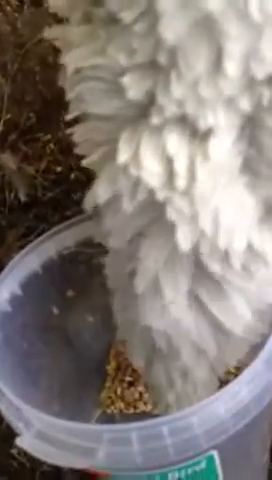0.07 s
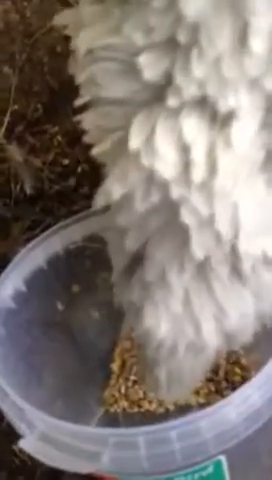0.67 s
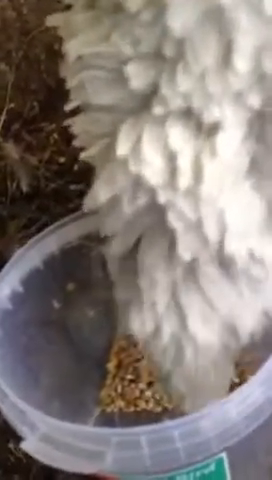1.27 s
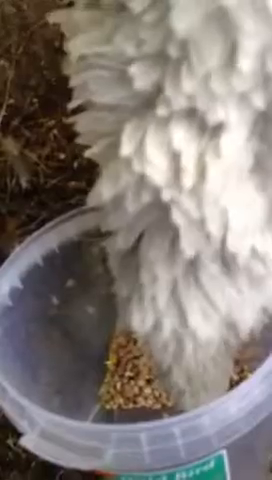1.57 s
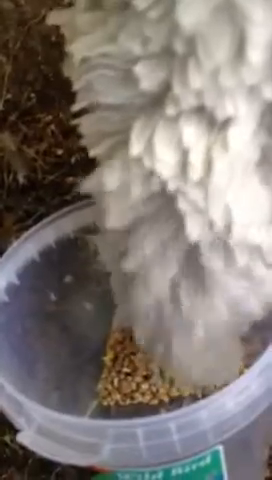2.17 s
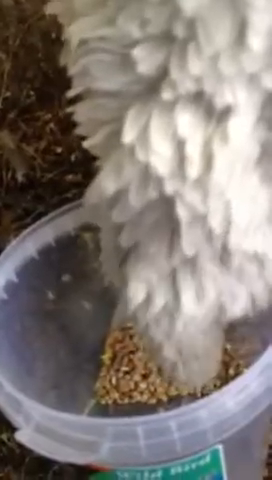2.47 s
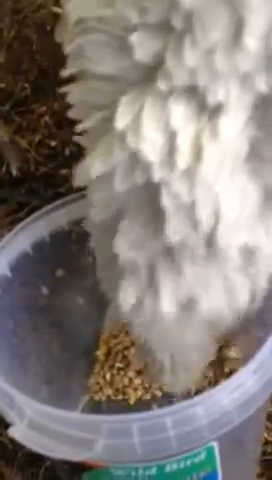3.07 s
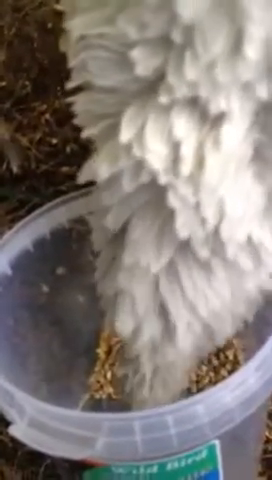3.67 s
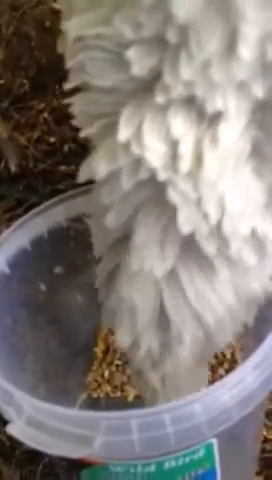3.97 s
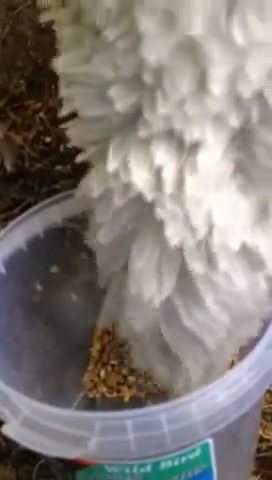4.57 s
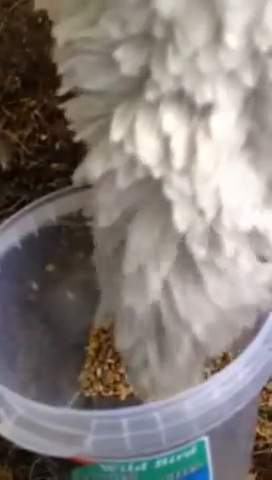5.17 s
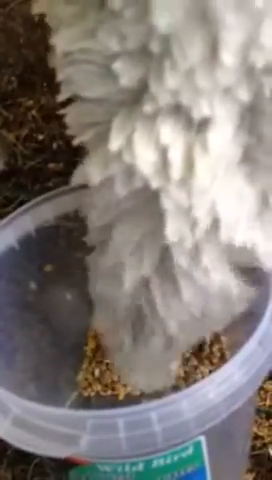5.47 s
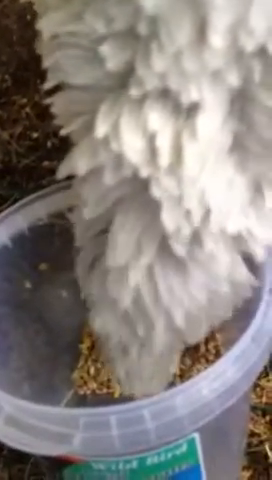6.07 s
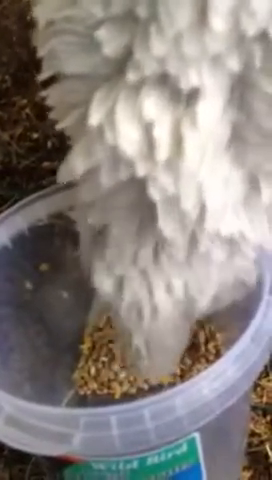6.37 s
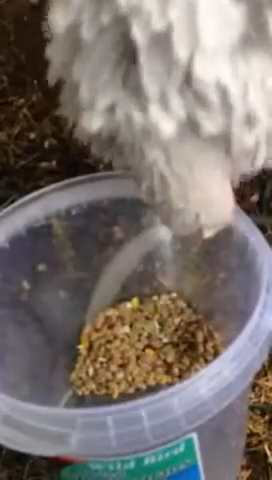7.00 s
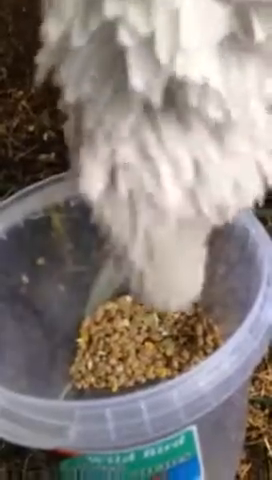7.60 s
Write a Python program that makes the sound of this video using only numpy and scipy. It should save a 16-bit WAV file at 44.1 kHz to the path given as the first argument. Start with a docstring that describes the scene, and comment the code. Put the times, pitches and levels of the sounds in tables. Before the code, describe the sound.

A hen feeds from a plastic tub of seed close by, outdoors, over a quiet steady hiss and a low, far rumble. She gives one soft, short cluck at the very start. Hard pecks land at about 0.4, 1.1 and 3.1 seconds, each crunching through the seed, knocking the tub and throwing up grains that patter down for about half a second. Sharp beak clicks fall between them, clustering near 2.8 seconds. Lighter pecks follow at about 4.7, 4.9, 5.6 and 6.3 seconds, then small ticks of beak and seed, with feathers faintly brushing the rim around 7 seconds. Further off, young birds give short sliding peeps at 2.2 and 3.3 seconds, several between 4.5 and 6, and more around 7.5. One faint, thin whistle rises just after 5 seconds. Brief dry scuffs in the litter come now and then, more often after 6.5 seconds.

```python
"""A hen gives one soft cluck, then three hard pecks knock a plastic tub of seed, close by and outdoors.
Each peck crunches through the seed, makes the tub ring and throws up seed that patters back down.
Lighter pecks and beak clicks follow, and her feathers brush the rim as she lifts her head.
Further off, young birds peep in sliding whistles and scuff in the litter, and one thin whistle rises.
A steady hiss and a low, far rumble lie behind it all."""
import sys
import numpy as np
from scipy import signal
from scipy.fft import rfft, irfft
from scipy.io import wavfile

SR = 44100
rng = np.random.default_rng(int(sys.argv[2]) if len(sys.argv) > 2 else 0)


def bounce(signal):
    """Save signal as a 16-bit WAV file at the path given by the first command-line argument."""
    frames = np.transpose(np.atleast_2d(signal))
    limited = np.clip(frames, -1, 1)
    pcm = np.round(limited * 32767).astype(np.int16)
    wavfile.write(sys.argv[1], SR, pcm)


N = 345744
TIME = np.arange(N) / SR


# The pecks. Each row: start in seconds, length in seconds, crunch in dB, knock in dB, extra floor
# drumming in dB, falling seed in dB, seconds for that to fade by 60 dB, seconds until the seed has landed.
PECKS = [(0.3679, 0.0087, -29.5, -43, -17, -49, 1.9, .375), (1.105, 0.011, -27, -35, -4, -48, 1.3, .44),
         (3.104, 0.0076, -27, -39.5, 9, -46, 1.3, .39), (4.702, 0.015, -53, -61, 12, -54, 0.87, .06),
         (4.896, 0.0015, -43.5, -69, 1, -61.5, .4, .04), (5.641, 0.0037, -40, -49, -4, -63, 0.5, 0.042),
         (6.265, 0.0059, -49.5, -53.5, -2, -63, 0.7, 0.018)]
# The tone of crunching seed. Each row: frequency in Hz, level in dB.
CRUNCH_TONE = [(240, -40), (400, -10), (1100, -11.5), (1800, -8), (3230, -2), (4130, -10.5), (5000, -6),
               (7520, -2), (9360, -15.5), (10400, -33), (22000, -100)]
# The notes of the tub's floor and wall. Each row: pitch in Hz, level in dB, seconds to fade by 60 dB.
TUB_NOTES = [(290, -1.5, 0.055), (490, -22.5, 0.04), (641, -3, 0.0357), (910, -2.5, 0.017),
             (1176, -11.5, .025), (1590, -10.5, 0.015)]

def pecks(lead_s=0.0018, release_s=0.0016, floor_hz=650, floor_width_hz=170):
    """The beak crunches through the seed and knocks the tub, drumming the notes of its floor."""
    out, t = np.zeros(N), np.arange(-SR // 50, SR // 5) / SR
    for start, length, crunch_db, knock_db, floor_db, *_ in PECKS:
        push = np.exp(np.minimum(t, 0) / lead_s - np.maximum(t - length, 0) / release_s)
        crunch = colour(push * rng.standard_normal(len(t)), CRUNCH_TONE)
        add(out, start + t[0], from_db(crunch_db) * crunch)
        blow = signal.unit_impulse(len(t), np.searchsorted(t, length / 2))
        knock = np.zeros(len(t))
        for k, (hz, db, fade_s) in enumerate(TUB_NOTES):
            note_db = db + floor_db * resonance(hz, floor_hz, floor_width_hz) + rng.standard_normal()
            knock += (-1) ** k * from_db(note_db) * ring(blow, hz, fade_s)
        add(out, start + t[0], from_db(knock_db) * band(knock, 170.2, 2400))   # a small tub has no bass
    return out


# Seed sliding or landing in handfuls. Each row: middle in seconds, half length in seconds, level in dB.
HANDFULS = [(.386, 0.0042, -42), (.463, 0.01, -46), (1.392, 0.024, -57.5), (3.097, 0.0079, -41.5),
            (3.178, 0.0082, -52)]
# The tone of pattering seed. Each row: frequency in Hz, level in dB.
PATTER_TONE = [(350, -31), (600, -17), (1160, -10.5), (1320, -21.5), (1510, -7.5), (2870, -6), (4600, -7),
               (7700, -1.5), (9150, -13), (10400, -44.5), (22000, -120)]

def falling_seed(settle_s=0.064, bounce_db=-8, dense_db=-42):
    """Seed thrown up by each peck patters down in uneven clumps, with whole kernels bouncing among it."""
    falling = swells(HANDFULS)
    for start, *_, seed_db, fade_s, landed_s in PECKS:
        age = TIME - start
        fade = np.exp(-np.log(1000) * np.abs(age) / fade_s) * (age > 0)
        still_moving = np.clip((landed_s - age) / settle_s + 1, 0, 1)
        falling += from_db(seed_db) * fade * still_moving
    clumps = from_db(2.3 * drift(70))
    density = np.clip(falling / from_db(dense_db), .1, 1)   # the patter thins out as it dies
    fine = grains(per_s=1900 * density, spread_db=1.5, seed_fade_s=0.0014, seed_db=4)
    fine *= np.sqrt(density.mean() / density)   # thinning alone does not make it quieter
    kernels = from_db(bounce_db) * grains(per_s=78, spread_db=1.5, seed_fade_s=0.001, seed_db=10.5)
    return falling * clumps * colour(fine + kernels, PATTER_TONE)


# The beak tip hitting the tub. Each row: time in seconds, peak in dB, wall level against the snap in dB.
BEAK_CLICKS = [(0.3736, -9, -19.5), (1.1247, -19, -9.5), (1.559, -42, 4), (2.2503, -35.5, 1),
               (2.754, -36.5, 9), (2.79, -24, 0), (2.8364, -40, 1.5), (2.9194, -44.5, 7),
               (3.5563, -37, -2.5), (4.8961, -31.5, -6), (4.9044, -32, 3), (4.9476, -36, -3),
               (5.655, -30, -4.5), (6.2593, -34.5, 22.5), (6.4241, -44, 0.5), (6.5102, -43.5, 0.5),
               (7.135, -37, -1.5), (7.2869, -35.5, -5)]
# The clearest single seeds snapping and landing. Each row: time in seconds, peak in dB.
SEED_CLICKS = [(0.473, -28), (0.494, -20), (0.522, -34), (0.539, -42), (0.5973, -29.5), (0.6342, -41.5),
               (0.661, -38), (0.6878, -42), (0.7578, -49), (1.1462, -27), (1.1541, -29), (1.2045, -43),
               (1.2212, -28.5), (1.3302, -41), (1.4024, -42), (1.4247, -38), (1.5054, -42.5), (2.4742, -50),
               (3.1105, -14.5), (3.1292, -24), (3.2077, -29.5), (3.2314, -32.5), (3.261, -31.5),
               (3.2763, -31), (3.324, -38.5), (3.497, -37.5), (3.5297, -42.5), (4.413, -47), (4.696, -40),
               (4.705, -34.5), (4.7407, -42.5), (5.6454, -41), (5.7447, -41.5), (6.267, -33), (6.7393, -44),
               (6.9029, -43), (7.034, -39.5), (7.0775, -38), (7.187, -32.5), (7.201, -33), (7.2292, -34.5)]

def clicks(snap_s=0.0015, wall_s=0.0019, ping_db=-21, chatter_db=-7):
    """Hard little hits: the seed snaps high and short, the plastic wall answers lower and longer."""
    out, t = np.zeros(N), np.arange(SR // 40) / SR
    hit = signal.unit_impulse(len(t))
    # a seed barely stirs the wall, each by a different amount
    seeds = [(when, db, -19 + 7 * rng.standard_normal()) for when, db in SEED_CLICKS]
    for when, peak_db, wall_db in list(BEAK_CLICKS) + seeds:
        chatter = from_db(chatter_db) * rng.standard_normal((2, len(t)))
        # a light touch on the wall leaves the seed free to ring
        ping = from_db(ping_db - 0.86 * wall_db) * ring(hit, rng.uniform(3700, 4900), 0.001)
        snap = band(hit + chatter[0] * np.exp(-t / snap_s) + ping, 3250, 6900)
        wall = band(hit + chatter[1] * np.exp(-t / wall_s), 800, 3300)
        click = rms_one(snap) + from_db(wall_db) * rms_one(wall)
        add(out, when - t[np.abs(click).argmax()], from_db(peak_db) * click / np.abs(click).max())
    return out


# Strokes of her feathers. Each row: middle in seconds, half length in seconds, level in dB.
FEATHER_STROKES = [(2.851, 0.15, -82), (5.38, 0.14, -74.5), (6.45, 0.48, -83), (6.976, 0.2, -67.5),
                   (7.07, 0.024, -71), (7.278, 0.051, -67), (7.738, 0.016, -68.5)]

def feathers(rest_db=-85, rustle_db=-2):
    """Feathers slide over the rim with a fine rustle and stir a few seeds."""
    uneven_touch = from_db(2 * drift(45))
    pressure = from_db(rest_db) + swells(FEATHER_STROKES)
    stirred = colour(grains(per_s=450, spread_db=7, seed_fade_s=0.0086, seed_db=-15.5), PATTER_TONE)
    rustle = rms_one(band(grains(per_s=1100, spread_db=8.5), 3900, 4900))
    return pressure * uneven_touch * (stirred + from_db(rustle_db) * rustle)


# The young birds' peeps. Each row: start in seconds, seconds until the closing flick, held pitch in Hz,
# opening slide in octaves, flick in octaves (plus is up), level in dB, overtones in dB, hoarseness (0-1).
PEEPS = [(2.171, 0.047, 1880, 0.93, .72, -37, -19.5, 0.04),
         (3.304, 0.046, 1908, 0.25, 0.61, -42.5, -16, 0.06), (4.508, 0.043, 1708, 0.045, 0.74, -42, -15, 0),
         (4.882, 0.039, 1784, .5, -0.47, -39, -28, 0.06),
         (5.029, 0.0091, 1920, 0.28, 0.037, -49.5, -33.5, 0.04),
         (5.064, 0.018, 2047, 0.046, -.5, -41.5, -20, 0), (5.267, .008, 1926, .45, 0.068, -46, -27, 0.2),
         (5.318, 0.0063, 1984, .011, -0.31, -50, -38, 0.35), (5.978, .051, 1907, 0.178, .65, -38, -21.5, 0),
         (7.421, 0.059, 2030, 0.19, 0.27, -44.5, -6, 0.04),
         (7.594, 0.057, 2233, 0.59, 0.26, -41.5, -15, 0.08), (7.607, 0.017, 2500, 0.025, -.22, -49, -11, 0)]

def peeps(slide_s=0.0098, sag_s=0.01485, crest_s=0.0142, push_s=0.0064,
          swell_db_per_s=113, dull_db_per_s=700):
    """Hoarse whistles slide up, hold and flick away, growing louder at pitches where the throat rings."""
    out = np.zeros(N)
    for start, hold_s, held_hz, slide, flick, level_db, overtones_db, hoarse in PEEPS:
        rising = flick > 0
        flick_s, after_s = (0.0036, 0.03) if rising else (0.00704, 0.019)
        length = hold_s + after_s
        age = np.arange(0, length, 1 / SR)
        to_flick = hold_s - age
        since_rise = np.maximum(-to_flick, 0) * rising
        flicked = .5 - .5 * np.tanh(to_flick / (2 * flick_s))   # goes from 0 to 1 through the flick
        sag = 0.0536 * np.exp(-(to_flick / sag_s - 1) ** 2)   # the pitch dips just before it
        fall_back = 13 * np.maximum(since_rise - crest_s, 0)   # an upward flick tops out and falls
        octaves = flick * flicked - slide * np.exp(-age / slide_s) - sag - fall_back
        hz = held_hz * 2 ** octaves
        phase, flutter = voice(hz, jitter=0.009, shimmer_db=1.5)
        roughness = rms_one(band(rng.standard_normal(len(age)), 150, 700))
        phase += (hoarse + 0.36 * flicked) * roughness   # uneven cycles roughen the overtones most
        push_db = 3.5 * (np.exp(-(to_flick / push_s) ** 2) - 1)   # a last breath drives the flick
        swell_db = -swell_db_per_s * np.maximum(to_flick, 0)
        weaken_db = -13.5 * flicked ** 2 * rising   # the voice weakens as it flicks up
        effort = from_db(level_db + push_db + swell_db + weaken_db)
        throat = resonance(hz, 1850, 160) + from_db(-11) * resonance(hz, 2870, 280) + from_db(-22)
        note = throat * np.sin(phase)
        for k, db in [(2, 0), (3, -10), (4, -27)]:
            tone_db = 9 * resonance(k * hz, 5200, 450) - dull_db_per_s * since_rise
            note += from_db(overtones_db + db + tone_db) * np.sin(k * phase)
        add(out, start, effort * flutter * fade_ends(age, length) * note)
    return out


# The tone of the hen's throat. Each row: frequency in Hz, level in dB.
THROAT_TONE = [(400, -9.5), (790, 0.5), (1180, -4), (1580, -22.5), (1980, -20), (2400, -25)]

def cluck(start_s=0.149, length_s=0.031, level_db=-42, open_hz=503, end_hz=360, drop_s=0.012):
    """One short falling note, its overtones shaped by the hen's throat."""
    out, age = np.zeros(N), np.arange(0, length_s, 1 / SR)
    hz = end_hz + (open_hz - end_hz) * np.exp(-age / drop_s)
    phase, flutter = voice(hz, jitter=0.0076, shimmer_db=0.7)
    note = sum(gain_at(THROAT_TONE, k * hz) * np.cos(k * phase) for k in range(1, 7)) / np.sqrt(2)
    shape = fade_ends(age, length_s, in_s=0.015, out_s=0.011)
    add(out, start_s, from_db(level_db) * flutter * shape * note)
    return out


# Scuffs in the litter. Each row: middle in seconds, rough length in seconds, level in dB, centre in Hz.
SCUFFS = [(2.144, 0.051, -65.5, 1980), (3.64, 0.075, -63, 1870), (5.353, 0.0084, -51.5, 1850),
          (5.388, 0.035, -62.5, 1600), (5.531, 0.21, -66, 1850), (6.539, 0.13, -69, 1720),
          (6.632, 0.014, -49, 1140), (6.873, 0.017, -55, 1270), (6.974, 0.017, -52.5, 1250),
          (7.263, 0.005, -48.5, 960), (7.368, 0.024, -54.5, 1380), (7.666, 0.0058, -53.5, 1350),
          (7.7, 0.014, -52.5, 1280), (7.731, 0.014, -47, 1240)]

def scuffs(width_ratio=1.42, catch_db=3):
    """Short dry swishes as the litter rubs, catching and slipping."""
    out, t = np.zeros(N), np.arange(-SR // 4, SR // 4) / SR
    for middle, length, db, hz in SCUFFS:
        friction = rng.standard_normal(len(t)) * from_db(catch_db * drift(400)[:len(t)])
        rasp = rms_one(band(friction, hz / width_ratio, hz * width_ratio))
        hiss = 0.3 * rms_one(band(friction, 460, 5000))
        shape = 1 / (1 + 3 * (t / length) ** 2)
        add(out, middle + t[0], from_db(db) * shape * (rasp + hiss))
    return out


def far_whistle(start_s=5.14, length_s=0.083, level_db=-72, start_hz=3500, rise_hz_per_s=12000):
    """A bird further off whistles one thin, even upward glide."""
    out, age = np.zeros(N), np.arange(0, length_s, 1 / SR)
    phase, flutter = voice(start_hz + rise_hz_per_s * age, jitter=0.01, shimmer_db=4.8)
    add(out, start_s, from_db(level_db) * flutter * fade_ends(age, length_s) * np.sin(phase))
    return out


# Echoes from the ground and the pen. Each row: delay in seconds, level in dB.
ECHOES = [(.0031, -17), (.0074, -19)]

def yard(x, tail_db, tail_fade_s):
    """Nearby surfaces throw the sound back as dull echoes and a faint, short tail."""
    t = np.arange(SR // 3) / SR
    tail = rng.standard_normal(len(t)) * np.exp(-np.log(1000) * t / tail_fade_s)
    response = from_db(tail_db) * rms_one(tail) / np.sqrt(len(t))
    for delay, db in ECHOES:
        response[round(delay * SR)] += from_db(db)
    return x + band(signal.fftconvolve(x, response)[:N], 200, 9810, order=1)


# The tone of the open air. Each row: frequency in Hz, level in dB.
AIR_TONE = [(24, -64), (40, -30), (141, -1), (199, -2.5), (270, -8.5), (303, -15.5), (800, -18.5),
            (1700, -26), (7360, -33), (10400, -53), (22000, -120)]
# How loud the far rumble is. Each row: time in seconds, level in dB.
RUMBLE_LEVELS = [(0.0, -60), (0.63, -63.5), (1.94, -58), (2.86, -65), (4.41, -65.5), (6.72, -61.5),
                 (6.92, -59), (7.84, -59.5)]

def background(air_db=-61, drone_db=-7, drone_growth=0.56):
    """Steady hiss over a far rumble, perhaps traffic; a higher drone comes through as it swells."""
    air = colour(rng.standard_normal(N), AIR_TONE)
    low = signal.sosfiltfilt(signal.butter(2, 450, fs=SR, output="sos"), air)
    rumble_db = np.interp(TIME, *np.transpose(RUMBLE_LEVELS))
    drone = rms_one(band(rng.standard_normal(N), 230, 385, order=4))
    drone *= from_db(drone_db + drone_growth * (rumble_db - rumble_db.mean()))
    return from_db(air_db) * (air - low) + from_db(rumble_db) * (rms_one(low) + drone)


def grains(per_s, spread_db, seed_fade_s=0.00067, seed_db=-4, ring_s=0.0033, chatter_s=0.00047):
    """Tiny random hits: each clicks, chatters and rings at its own pitch and at one all seeds share."""
    sizes = from_db(spread_db * np.minimum(rng.exponential(1, N), 3)) * rng.choice([-1, 1], N)
    hits = sizes * (rng.random(N) < per_s / SR)
    pitches = np.geomspace(1300, 9000, num=14)
    chosen = rng.integers(0, len(pitches), N)
    own_rings = sum(ring(hits * (chosen == k), hz, ring_s) * np.sqrt(hz) for k, hz in enumerate(pitches))
    shared_ring = ring(hits, 4450, seed_fade_s)
    energy = signal.lfilter([1], [1, -np.exp(-2 / (chatter_s * SR))], hits ** 2 + 1e-18)
    chatter = np.sqrt(energy) * rng.standard_normal(N)
    parts = [(own_rings, 0), (hits, -4), (chatter, 3), (shared_ring, seed_db)]
    return rms_one(sum(from_db(db) * rms_one(part) for part, db in parts))


def voice(hz, jitter, shimmer_db):
    """Phase and loudness of an unsteady voice: jitter shakes its pitch, shimmer its level."""
    pitch_waver, level_waver = [rms_one(band(rng.standard_normal(len(hz)), 44, 180)) for _ in range(2)]
    phase = 2 * np.pi * np.cumsum(hz * (1 + jitter * pitch_waver)) / SR
    return phase, np.sqrt(2) * from_db(shimmer_db * level_waver)


def ring(x, hz, fade_s):
    """Each click in x starts a pure note that fades by 60 dB in fade_s seconds."""
    decay, step = np.exp(-np.log(1000) / (fade_s * SR)), 2 * np.pi * hz / SR
    return signal.lfilter([0, np.sin(step)], [1, -2 * decay * np.cos(step), decay ** 2], x + 1e-18)


def resonance(hz, centre_hz, width_hz):
    """1 at the pitch where something rings best, falling towards 0 on either side."""
    return 1 / (1 + ((hz - centre_hz) / width_hz) ** 2)


def fade_ends(age, length, in_s=0.0071, out_s=0.0043):
    """Fade in smoothly, hold, and fade out."""
    return np.sin(np.pi / 2 * np.clip(np.minimum(age / in_s, (length - age) / out_s), 0, 1)) ** 2


def swells(rows):
    """A level that rises and falls once for each row."""
    return sum(from_db(db) * np.exp(-((TIME - middle) / half) ** 2) for middle, half, db in rows)


def drift(per_s):
    """A random wander around 0 that turns about per_s times a second."""
    return np.interp(TIME * per_s, np.arange(N), rng.standard_normal(N))


def gain_at(tone, hz):
    """Look up a tone table's gain at these frequencies."""
    table_hz, db = np.transpose(tone)
    return from_db(np.interp(np.log(np.maximum(hz, 1)), np.log(table_hz), db))


def colour(x, tone):
    """Shape a sound by a tone table; white noise keeps its power."""
    gain = gain_at(tone, np.linspace(0, SR / 2, len(x) // 2 + 1))
    return irfft(rfft(x) * rms_one(gain), len(x))


def band(x, low_hz, high_hz, order=2):
    """Keep what lies between two frequencies."""
    return signal.sosfilt(signal.butter(order, [low_hz, high_hz], "band", fs=SR, output="sos"), x + 1e-18)


def from_db(db):
    """Turn decibels into a gain to multiply by."""
    return 10 ** (np.asarray(db) / 20)


def rms_one(x):
    """Scale a sound so its average strength (rms) is 1."""
    return x / np.sqrt(np.mean(x ** 2) + 1e-20)


def add(out, start_s, sound):
    """Mix a short sound in at this time."""
    i = max(round(start_s * SR), 0)
    out[i:i + len(sound)] += sound[:max(N - i, 0)]


def scene():
    """The tub close by and the other birds further off, in one channel."""
    tub = yard(pecks() + falling_seed() + clicks() + feathers(), tail_db=-22, tail_fade_s=0.15)
    flock = yard(peeps() + cluck() + scuffs() + far_whistle(), tail_db=-19, tail_fade_s=0.18)
    return (tub + flock + background())[None]


def record(dry, dull_hz=9500, cutoff_hz=10600):
    """The microphone dulls the highest treble, and the top is cut."""
    dull = signal.sosfilt(signal.butter(4, dull_hz, fs=SR, output="sos"), dry)
    return signal.sosfilt(signal.butter(12, cutoff_hz, fs=SR, output="sos"), dull)


dry = scene()
out = record(dry)
bounce(out)
```